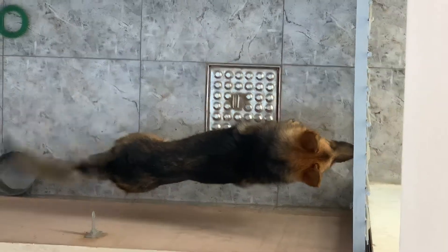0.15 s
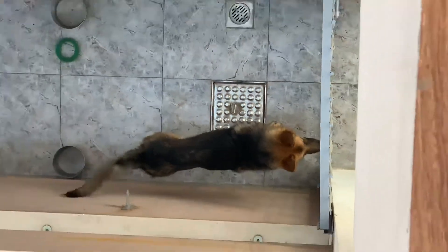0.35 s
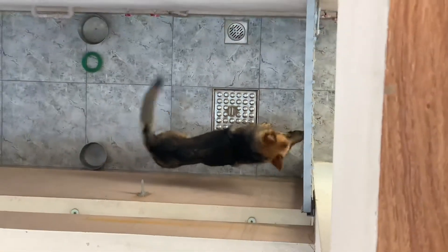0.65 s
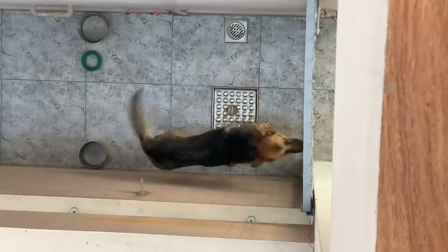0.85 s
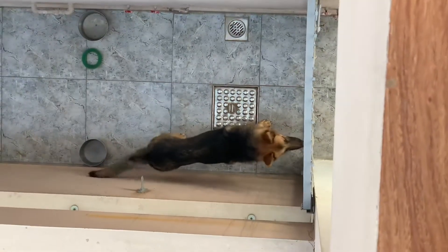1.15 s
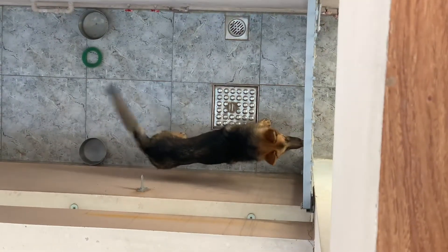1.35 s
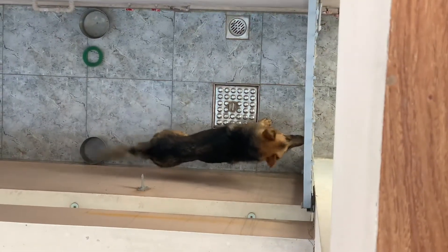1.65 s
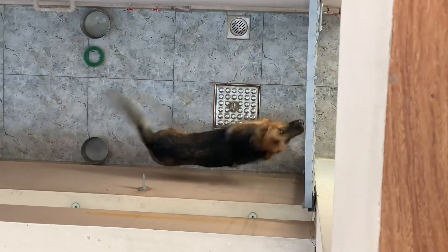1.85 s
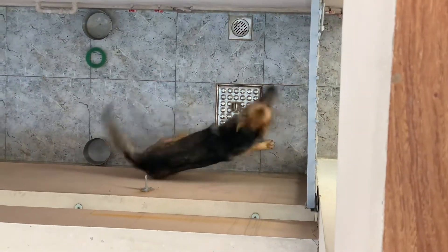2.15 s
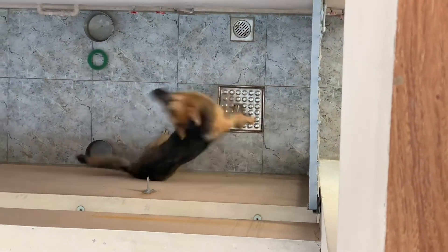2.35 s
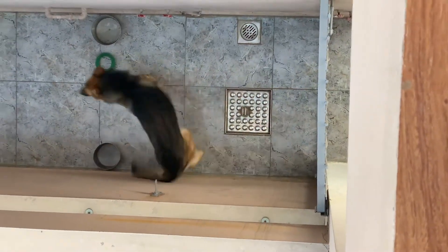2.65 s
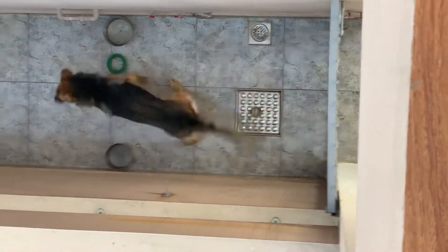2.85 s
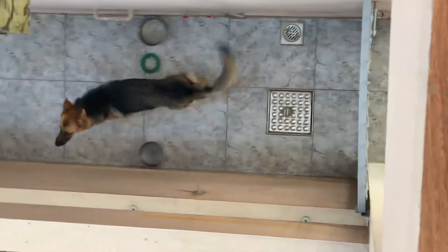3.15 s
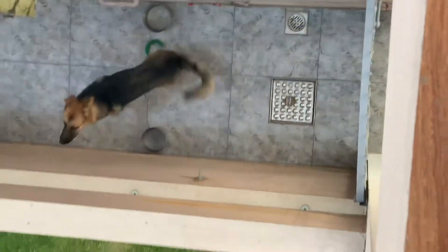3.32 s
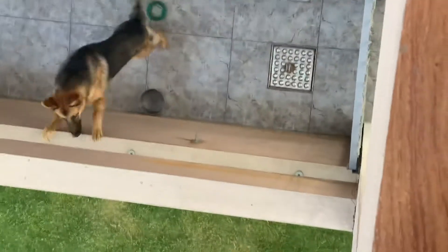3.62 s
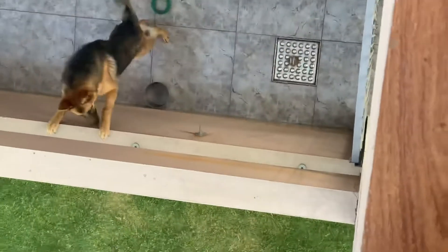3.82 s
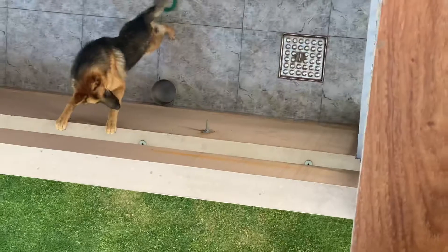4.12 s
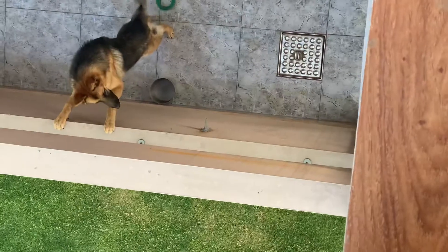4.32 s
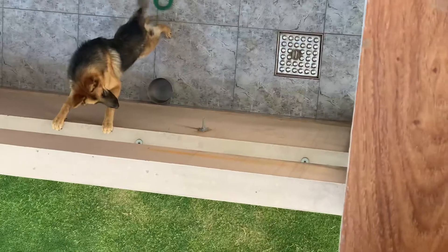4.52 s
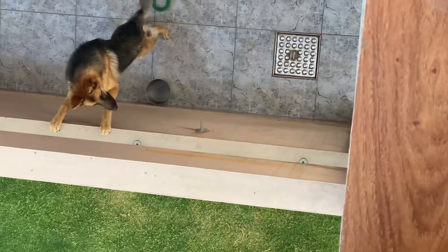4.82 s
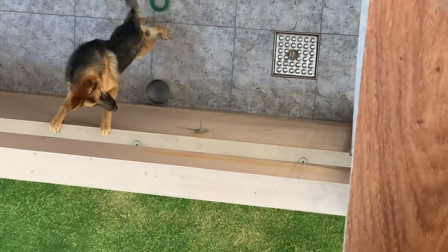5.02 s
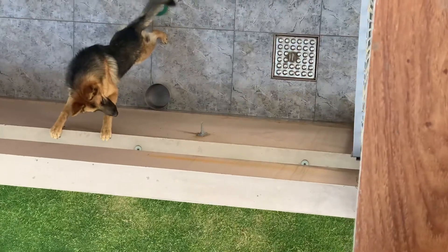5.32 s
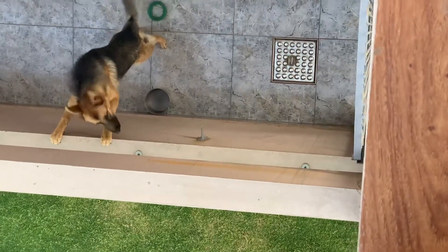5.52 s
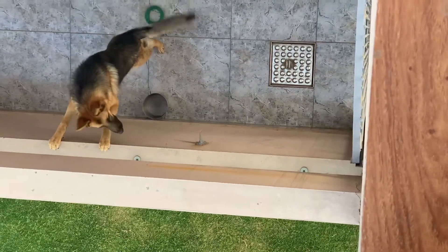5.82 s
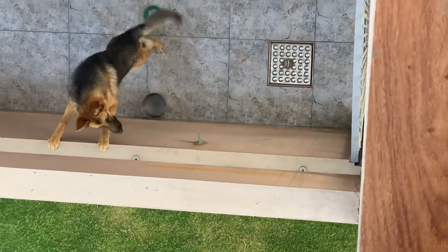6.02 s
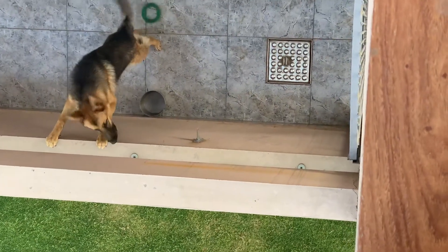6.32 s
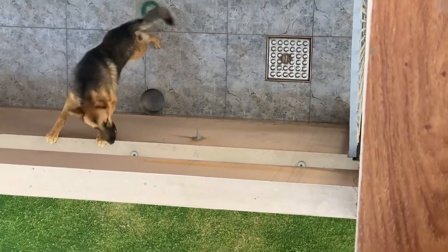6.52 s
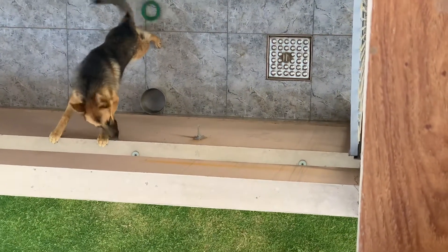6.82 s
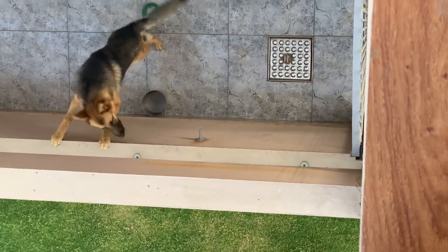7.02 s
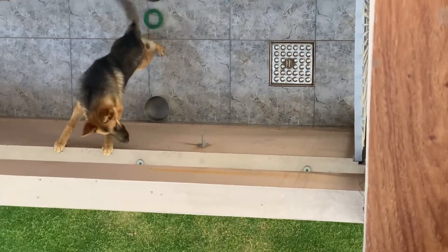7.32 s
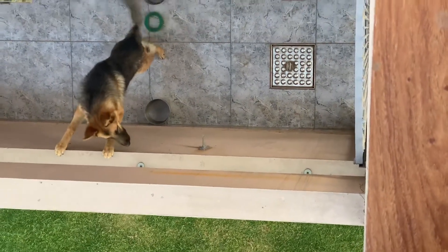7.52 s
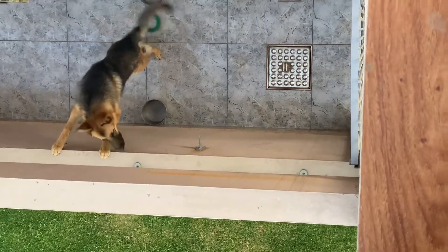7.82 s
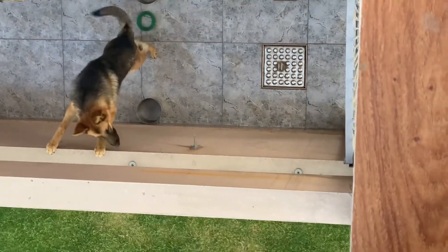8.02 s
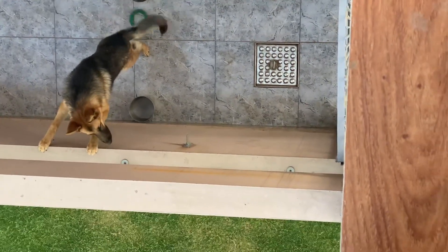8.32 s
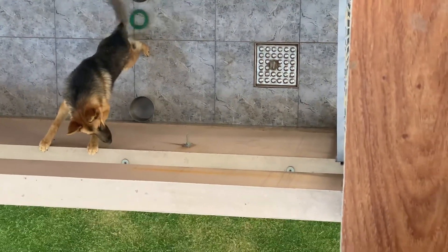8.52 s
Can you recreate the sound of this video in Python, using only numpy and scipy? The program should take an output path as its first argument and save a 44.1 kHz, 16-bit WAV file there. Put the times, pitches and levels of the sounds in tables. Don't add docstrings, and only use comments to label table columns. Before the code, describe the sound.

A large dog barks hoarsely in sharp single barks and quick runs, with panting and growls, echoing off balcony walls and distant houses over faint town rumble.

```python
import sys
import numpy as np
from scipy import signal
from scipy.fft import rfft, irfft, next_fast_len
from scipy.io import wavfile
from scipy.ndimage import uniform_filter1d, minimum_filter1d, map_coordinates

SR = 44100
rng = np.random.default_rng(int(sys.argv[2]) if len(sys.argv) > 2 else 0)


def makeup_ratio(level_db):
    decades = np.asarray(level_db, float) / 20
    return 10 ** decades


def file_out(sig):
    cols = np.atleast_2d(sig).T
    lim = np.clip(cols, -1, 1)
    pcm = np.round(lim * 32767).astype(np.int16)
    wavfile.write(sys.argv[1], SR, pcm)


N = 381906


def unit(x):
    return x / np.sqrt(np.mean(np.abs(x) ** 2) + 1e-20)


def along(points, hz):
    f, v = np.transpose(points)
    return np.interp(np.log(hz + 1), np.log(f + 1), v)


def span(rows):
    s, *columns = np.transpose(rows)
    first = round(s[0] * SR)
    t = np.arange(first, min(N, round(s[-1] * SR))) / SR
    return first, [np.interp(t, s, c) for c in columns]


def wobble(n, rate):
    knots = rng.standard_normal(int(n * rate / SR) + 4)
    return map_coordinates(knots, [np.arange(n) * rate / SR])


def filtered(x, response):
    m = next_fast_len(x.shape[-1] + 8192)
    return irfft(rfft(x, m) * response(np.fft.rfftfreq(m, 1 / SR)), m)[..., :x.shape[-1]]


def peak(f, hz, width):
    return 1j * f * width / (hz * hz - f * f + 1j * f * width)


def modes(table):
    return lambda f: sum((-1) ** k * makeup_ratio(db) * peak(f, hz, w) for k, (hz, w, db) in enumerate(table))


def add(out, at, x):
    out[..., at:at + x.shape[-1]] += x[..., :N - at]


def placed(x, pan_db, lag):
    late_s = rng.uniform(.0005, .012, (5, 1, 1)) + rng.uniform(0, .0003, (5, 2, 1))
    size = makeup_ratio(-21) * rng.normal(size=(5, 1, 1)) + makeup_ratio(-13) * rng.normal(size=(5, 2, 1))
    half = np.array([[.5], [-.5]])

    def paths(f):
        direct = np.exp(-2j * np.pi * f / (1 + (f / 9000) ** 2) * lag * half / SR)
        bounces = np.sum(size * np.exp(-2j * np.pi * f * late_s), axis=0)
        return direct + f * f / (f * f + 400 ** 2) * bounces

    return filtered(np.pad(x, (0, 800))[None], paths) * makeup_ratio(pan_db * half)


def town():
    # hz, density_db (per Hz)
    spectrum = [(12, -31.5), (25, -8), (40, -9), (59, 8.5), (85, 0.5), (256, -9), (328, -14), (587, -18.5),
                (889, -23.5), (1020, -23), (1210, -22), (2480, -29), (5000, -38.5), (13100, -48.5),
                (15000, -80)]
    # time_s, level_db
    swell = [(0, -49.5), (0.499, -49), (1.2, -45.5), (2, -47), (2.999, -48), (4.501, -48.5), (5.997, -50),
             (6.301, -48.5), (7.6, -51.5), (8.66, -51)]
    # hz, likeness (0-1)
    likeness = [(60, .97), (250, .96), (1000, .5), (4000, .15)]
    z = signal.stft(rng.standard_normal((2, N)), nperseg=1024)[2]
    fine = uniform_filter1d(uniform_filter1d(rng.standard_normal(z.shape[1:]), 8, 0), 8, 1)
    broad = uniform_filter1d(uniform_filter1d(fine, size=40, axis=0), size=10, axis=1)
    patches_db = 2 * unit(fine) + .7 * unit(broad)
    pair = signal.istft(z * makeup_ratio(patches_db), nperseg=1024)[1][:, :N]

    def mid_side(hz):
        turn = np.arccos(np.clip(along(likeness, hz), -1, 1)) / 2
        return makeup_ratio(along(spectrum, hz)) * [np.cos(turn), np.sin(turn)]

    mid, side = filtered(pair, mid_side)
    s, db = np.transpose(swell)
    level_db = np.interp(np.arange(N) / SR, s, db) + [[-1.5], [1.5]]
    return unit(np.array([mid + side, mid - side])) * makeup_ratio(level_db)


def knocks():
    # time_s, peak_db, pitch_hz
    blows = [(0.145, -48, 1550), (1.331, -43, 444), (7.542, -34.5, 1040), (8.637, -44.5, 1040),
             (2.0, -34.5, 387.6), (2.031, -35.5, 397), (4.207, -39.5, 590), (4.967, -48, 519),
             (5.153, -37.5, 478), (8.398, -43, 450)]
    out, t = np.zeros((2, N)), np.arange(SR // 10) / SR
    for s, db, hz in blows:
        envelope = makeup_ratio(db - 3.0 - 60 * t / 0.17) * (1 - np.exp(-t / 0.0035))
        add(out, round(s * SR), envelope * np.sin(2 * np.pi * hz * t))
    return out


def bird():
    # start_s, start_hz, end_hz, length_s, level_db
    whistle = (3.217, 4050, 3750, .05, -48)
    s, from_hz, to_hz, length, db = whistle
    out = np.zeros((2, N))
    u = np.clip(np.arange(SR // 10) / SR / length, 0, 1)
    hz = to_hz + (from_hz - to_hz) * (1 - u) ** 3 + 40 * wobble(len(u), 199)
    add(out, round(s * SR), makeup_ratio(db) * np.sin(np.pi * u) * np.sin(2 * np.pi * np.cumsum(hz) / SR))
    return out


def tail(decay, seconds, gap, lumpy_db):
    n = round(seconds * SR)
    noise = rng.standard_normal((3, n))
    pair = (noise[:2] + 0.5 * noise[2]) * makeup_ratio(lumpy_db * wobble(n, 38))
    hz, t, z = signal.stft(pair, SR, nperseg=256)
    h = signal.istft(z * makeup_ratio(-60 * t / along(decay, hz)[:, None]), SR, nperseg=256)[1]
    return np.pad(h / np.linalg.norm(h[0]), ((0, 0), (round(gap * SR), 0)))


def balcony():
    # hz, t60_s
    decay = [(200, 0.4), (1000, 0.28), (3000, 0.1), (4500, .08), (5600, 0.34), (10000, 0.077)]
    return makeup_ratio(-14) * tail(decay, seconds=.4, gap=.01, lumpy_db=1)


def flutter():
    # round_trip_s, centre_hz, width_hz, first_return_db, loss_per_trip_db
    facing = (.243, 1043.5, 196.5, -25, -4.5)
    trip, hz, width, first_db, loss_db = facing
    trips = np.zeros(2 * SR)
    trips[np.round(np.arange(1, 8) * trip * SR).astype(int)] = makeup_ratio(first_db + loss_db * np.arange(7))
    return filtered(trips, lambda f: peak(f, hz, width) ** 2)


def wall():
    # round_trip_s, spread_s, level_db
    front = (0.098, 0.01, -23.5)
    trip, spread, db = front
    t = np.arange(SR // 4) / SR
    noise = rng.standard_normal(len(t)) + .5 * rng.standard_normal((2, len(t)))
    h = noise * np.exp(-((t - trip) / spread) ** 2)
    return makeup_ratio(db) * h / np.linalg.norm(h[0])


def houses():
    # hz, t60_s
    decay = [(300, 1.7), (1100, 1.35), (2100, 0.97), (2900, 0.75), (3400, 1.8), (6000, 0.86)]
    fronts = lambda f: .4 + .5 * peak(f, 1150, 300) + .6 * peak(f, 2700, 1800)
    far = makeup_ratio(-15.5) * filtered(tail(decay, seconds=2.2, gap=.04, lumpy_db=-3.5), fronts)
    add(far, 0, flutter())
    add(far, 0, filtered(wall(), fronts))
    return far


def claws():
    # time_s, peak_db, left_right_db
    ticks = [(0.377, -73, 7.5), (1.1633, -63, 7.5), (1.4147, -59, 0), (1.5134, -55, 2), (3.5079, -67, -6),
             (3.5412, -57, 3.5), (3.5726, -48, -1.5), (3.6466, -50, 0), (3.935, -43.5, -16),
             (4.7201, -45.5, -2.5), (4.928, -51, -2.5), (4.977, -52.5, 4), (5.9198, -65, -7.5),
             (6.0673, -65.5, 1), (6.1085, -53.5, 5.5), (7.932, -54, 2)]
    out, t = np.zeros((2, N)), np.arange(SR // 10) / SR
    for s, db, pan_db in ticks:
        burst = rng.standard_normal(len(t)) * makeup_ratio(-60 * t / 0.0087)
        tick = filtered(burst, lambda f: peak(f, 7200, 6000))
        add(out, round(s * SR), makeup_ratio(db + 3.5) * tick * makeup_ratio([[pan_db / 2], [-pan_db / 2]]))
    return out


def panting():
    # start_s, length_s, level_db
    puffs = [
        (2.936, 0.21, -41.5),
        (3.715, 0.18, -39),
        (4.455, 0.19, -39.5),
        (5.117, 0.19, -39),
    ]
    # centre_hz, width_hz, level_db
    muzzle = [(846, 98, -3), (1448, 547, 2), (1892, 514, 3), (4240, 600, -8.5), (5740, 1000, -12.5),
              (8830, 2300, -13.5)]
    attack_s, release_s, quiet_db = 0.048, 0.22, -13.5
    out = np.zeros((2, N))
    for s, length, db in puffs:
        end = s + length
        at, (level_db,) = span([(s, db + quiet_db), (s + attack_s, db), (end, db),
                                (end + release_s, db + 2 * quiet_db)])
        air = unit(filtered(rng.standard_normal(len(level_db)), lambda f: modes(muzzle)(f) ** 2))
        add(out, at, placed(air * makeup_ratio(level_db + 0.63 * wobble(len(air), 90)), pan_db=0.0, lag=11.97))
    return out


def growls():
    # start_s, length_s, first_db, last_db, flaps_hz
    rumbles = [
        (4.456, 1, -51, -53, 62.54),
        (6.86, .22, -38, -44.5, 76.8),
        (7.067, .53, -39, -38.5, 77.3),
    ]
    # centre_hz, width_hz, level_db
    chests = [
        [(191.3, 88, 3.5), (267, 26, -8.5)],
        [(396.4, 53, 1), (235, 70, -3.5)],
        [(382, 41, 3), (230.1, 80, -3), (149.4, 55, -5.5), (727, 81, -7), (1540, 220, -12.5)],
    ]
    attack_s, quiet_db = 0.11, -13.5
    out = np.zeros((2, N))
    for (s, length, first_db, last_db, flap_hz), chest in zip(rumbles, chests):
        at, (level_db,) = span([(s, first_db + quiet_db), (s + attack_s, first_db), (s + length, last_db)])
        count = np.cumsum(flap_hz * (1 + .04 * wobble(len(level_db), 60))) / SR
        flaps = np.diff(np.floor(count), prepend=0) * makeup_ratio(0.47 * wobble(len(count), 85))
        flaps += .015 * rng.standard_normal(len(count))
        ringing = unit(filtered(flaps, lambda f: modes(chest)(f) ** 2))
        add(out, at, placed(makeup_ratio(level_db) * ringing, pan_db=-0.5, lag=1.0))
    return out


def gesture(call, breath, throat, part, rough_break, unsettled):
    # time_s, change_db, half_length_s
    level_swings = [(0.8, 5.5, 0.0085), (0.833, -3.5, 0.0066), (1.8, 8.5, 0.0093), (1.818, -6.5, 0.0089),
                    (1.845, -3, 0.0024), (2.078, -5, .011), (2.136, 4.5, 0.016), (2.152, -21.5, 0.007),
                    (2.178, 6, 0.0058), (2.659, -5.5, 0.0058), (2.672, 3.5, 0.0036), (2.676, -9, 0.00087),
                    (2.701, -14.5, 0.0036), (2.727, 6.5, 0.0019), (2.713, -5.5, 0.0039), (2.737, -14.5, 0.0076),
                    (5.397, 4, 0.003), (5.405, 5, 0.003), (5.406, -5, 0.0056), (5.429, 3.5, 0.009),
                    (5.456, -1, 0.006), (6.238, -6, 0.0037), (6.256, 4.5, 0.0064), (6.267, -8.5, 0.0027),
                    (6.276, 4, .004), (6.287, -3.5, 0.0064), (6.348, -1.5, 0.0089), (6.513, -9.5, 0.0027),
                    (6.523, 2, 0.0044), (6.527, -0.5, 0.0057), (6.55, 7.5, 0.002), (6.565, -4, 0.01),
                    (6.59, 2, 0.0035), (6.775, -1.5, .008), (6.814, -5, 0.0057), (6.872, -3, .007),
                    (7.616, -10.5, 0.0031), (7.628, 5, 0.0058), (7.672, -3.5, 0.0062), (7.692, -1, 0.0054)]
    s, length, db, shut_hz, top_hz = call
    attack, jump, last_hz, fade_db, grunt_db = breath
    rough, wide, upper_db = throat
    rough_onset, rough_grunt = .2, .65
    lock_s, creep, arch_s = .01, .5, .025
    release_s, grunt_s, grunt_hz = .022, 0.098, 186.9
    sluggish_s = .007
    open_hz = max(shut_hz, (top_hz + last_hz) / 2)
    shut_db = upper_db - 9
    slit = 0.037 * wide
    end = length + release_s
    release_db = max(fade_db - 20, grunt_db)
    rows = np.array([  # time_s, pitch_hz, level_db, roughness, mouth, upper_db
        (0, .88 * shut_hz, -22, rough_onset, slit, shut_db),
        (attack, shut_hz, 0, rough_onset, slit, shut_db),
        (min(attack + part, jump - lock_s), shut_hz, 0, rough_break, slit, upper_db),
        (jump - lock_s, shut_hz + creep * (open_hz - shut_hz), 0, rough_break, wide / 2, upper_db),
        (jump, open_hz, 0, rough, wide, upper_db),
        (min(jump + arch_s, length), top_hz, fade_db * arch_s / length, rough, wide, upper_db),
        (length, last_hz, fade_db, rough, wide, upper_db),
        (end, 0.67 * last_hz, release_db, rough_grunt, 0, shut_db),
        (end + grunt_s, grunt_hz, grunt_db - 9, rough_grunt, 0, shut_db)])
    rows[:, 0] = s + np.maximum.accumulate(rows[:, 0])
    at, controls = span(rows)
    smooth = uniform_filter1d(controls, round(sluggish_s * SR), mode="nearest")
    pitch, level_db, rough, mouth, upper_db = smooth
    t = (at + np.arange(len(pitch))) / SR
    swing_db = sum(dip_db * np.exp(-((t - when) / half) ** 2) for when, dip_db, half in level_swings)
    loose = np.interp(t - s - jump, [-lock_s, 0, unsettled, unsettled + lock_s], [0, 1, 1, 0])
    loose = (unsettled > 0) * loose
    rough = rough + loose * (rough_break - rough)
    return at, (pitch, db + level_db + swing_db, rough, mouth * (1 - loose / 2), upper_db)


def rasp(turn, level_db, rough, upper_db, air_db, gap_hz, top_db, snaps):
    # hz, density_db (per Hz)
    colour = [(1530, -39), (2600, -15), (4190, -16), (4760, -13.5), (5370, -16), (6610, -11), (9680, -17.5),
              (11800, -15), (13900, -21.5), (15500, -53)]
    n = len(turn)
    closing = unit(np.diff(np.floor(turn / (2 * np.pi)), prepend=0))
    snaps = np.clip(snaps, 0, 1) * np.clip(1 - rough, 0, 1)
    hz, _, z = signal.stft((1 - snaps) * rng.standard_normal(n) + snaps * closing, SR, nperseg=256)
    colour_db = along(colour, hz) + top_db * np.clip(np.log2(hz / 7000 + 1e-9), 0, 1)
    colour_db = colour_db - 24 * np.abs(peak(hz, gap_hz, 570)) ** 2
    patches = uniform_filter1d(rng.standard_normal(z.shape), size=2, axis=0)
    patches = uniform_filter1d(patches, size=20, axis=1)
    air = unit(signal.istft(z * makeup_ratio(colour_db[:, None] + 6.5 * unit(patches)), nperseg=256)[1][:n])
    air *= (1 + .5 * np.cos(turn)) * makeup_ratio(air_db - 28.5 + 2.2 * rough + .5 * upper_db)
    late_s = 0.012
    late_db = np.interp(np.arange(n) - late_s * SR, np.arange(n), level_db, left=-70)
    return air * makeup_ratio(0.44 * (late_db - level_db) + 2.4 * wobble(n, 30))


def bark(pitch, level_db, rough, mouth, upper_db, air_db, nose_hz, nose_db, cut_hz,
         gap_hz, top_db, snaps, cavities, shift_hz, drift, pattern):
    n = len(pitch)
    turn = 2 * np.pi * np.cumsum(pitch * (1 + 0.044 * rough * wobble(n, 250))) / SR
    mouth = np.clip(mouth, .02, .98)
    mouth_hz, cheek_hz, cheek_db, half_db, palate_db = cavities
    low_hz = np.minimum(pitch, 560)
    upper_hz = 1550 + shift_hz + 580 * mouth
    cheek = makeup_ratio(cheek_db - 13.0 + 19.5 * rough)
    voice, power = np.zeros(n), np.zeros(n)
    for k in np.arange(1, 11 * pattern + 1) / pattern:
        f = k * pitch
        throat = (1 - mouth) * peak(f, low_hz, 290) ** 2 + mouth * peak(f, mouth_hz, 320) ** 2
        throat = throat + makeup_ratio(upper_db) * peak(f, upper_hz, 320) ** 2
        throat = throat + cheek * peak(f, cheek_hz, 220) ** 2
        throat = throat + makeup_ratio(palate_db) * peak(f, 2450, 170) ** 2
        below = makeup_ratio(half_db - 7.0) if k < 1 else 1
        throat = throat * below / (1 + (f / cut_hz) ** 14)
        throat = throat + makeup_ratio(-38.5) * mouth * peak(f, 5700, 610) ** 2
        throat = throat + makeup_ratio(nose_db) * mouth * peak(f, nose_hz, 310) ** 2
        share = np.clip(rough * (.4 + .4 * k + .3 * (k % 1 > 0)), 0, 1)
        smear = .8 * unit(wobble(n, drift) + 1j * wobble(n, drift))
        steady = (1 - share ** 2) * (k % 1 == 0)
        voice += np.imag(throat * (steady + share * smear) * np.exp(1j * k * turn))
        power += np.abs(throat) ** 2 * (steady ** 2 + .64 * share ** 2) / 2
    air = rasp(turn, level_db, rough, upper_db, air_db, gap_hz, top_db, snaps)
    fade = np.minimum(1, np.minimum(np.arange(n), np.arange(n)[::-1]) / 250)
    return fade * makeup_ratio(level_db) * (voice / np.sqrt(power) + air)


def barks():
    # start_s, length_s, level_db, shut_lips_hz, top_hz
    calls = [(0.723, 0.11, -11.5, 513, 572.4), (0.831, 0.073, -23.5, 572.6, 580),
             (1.775, 0.11, -6.5, 552, 555.7), (2.054, 0.13, -13, 418, 577.4),
             (2.62, 0.11, -11.5, 825.4, 1171), (3.193, 0.025, -26.5, 415, 383),
             (5.356, 0.13, -13, 415.8, 554), (6.214, .128, -11.5, 382, 500.4),
             (6.465, 0.13, -11, 384.7, 497.7), (6.757, .11, -11, 387.8, 518.3),
             (6.866, 0.039, -18.5, 481.5, 510), (7.58, 0.13, -13.5, 383.8, 535.2)]
    # attack_s, jump_done_s, last_hz, fade_db, grunt_db
    breaths = [(.02, .05, 530, -6.5, -21), (0.011, 0.012, 540, -9, -29), (0.028, 0.029, 480, -12.5, -30),
               (.03, 0.049, 526, -5, -28.5), (.032, 0.046, 1125, -3.5, -48), (0.013, 0.022, 395, -7, -62),
               (.032, 0.062, 545, -0.5, -41), (0.02, 0.067, 510, -3, -15.5), (.034, 0.064, 419, -7, -17.5),
               (.04, .067, 520, -9, -27), (0.019, 0.023, 510, -6, -18), (.02, 0.055, 520, 1.5, -15)]
    throats = [(0.6, 0.16, -7, 2700, -17), (0.2, 0.7, -12.5, 2900, -14), (0.69, 0.36, -5.5, 3000, -23.5),
               (0.13, 0.87, -9.5, 3350, -25), (0.26, 0.6, -9, 3370, -35), (0, 0, -35, 3200, -53),
               (0.13, 0.64, -3, 3300, -25), (0.52, 0.54, -9, 4500, -33.5), (0.7, 0.05, -7, 3350, -7.5),
               (0.06, 0.72, -4, 2400, -34), (0.49, 0.18, -9.5, 2700, -32.5), (0.2, 0.68, -9, 3150, -28.5)]
    # left_right_db, air_noise_db, sent_to_houses_db, voice_cutoff_hz
    heads = [(2, -1, -1, 2600), (3, 2.5, 6.5, 3500), (0.5, -1.5, 2.5, 2180), (2, 5.5, -2.5, 2770),
             (-1.5, 8, -1.5, 2740), (1, 15, -5, 2700), (-0.5, 1.5, -5.5, 2680), (-0.5, 6, -9.5, 2264),
             (-0.5, 0.5, 0, 2450), (-1, 1.5, -3.5, 2290), (-1, -3, -16, 2400), (1, 4.5, -5, 2340)]
    # lips_part_s, roughness of the break (0-1), unsettled_past_jump_s
    settles = [(.02, .55, 0), (.01, .3, 0), (.022, .45, 0), (.014, .6, 0), (.006, .5, 0), (.01, .03, 0),
               (.006, .7, .024), (.018, .65, 0), (.018, .65, 0), (.02, .55, 0), (.01, .6, 0),
               (.024, .7, .042)]
    # gap_in_air_hz, top_octave_db, share of fold snaps (0-1), left_lag (samples)
    shadows = [(4540, -6, 0.87, -3), (4594, -7, .3, -2.5), (9300, 5, 0.04, -2), (9400, -2, 0.19, -2.5),
               (4300, -10.5, 0.6, -4), (4400, -7, 0.2, -3), (5300, -2, 0, -2), (5360, -4.5, 0.4, -2),
               (3840, -2, 0.8, -2), (5400, -11.5, 0.6, -2), (5440, -3, .2, -0.5), (4500, -9, 0.2, -2.5)]
    # mouth_hz, cheek_hz, cheek_db, half_pitch_db, palate_db
    hollows = [(1038, 810, -1.5, 4, -18), (1160, 780, -16.5, -0.5, -23), (940, 750, -2, 8.5, -22.5),
               (1042, 580, -16.5, 3.5, -29.5), (1250, 900, -10.5, -5, -29.5), (1070, 890, -12, -9, -46),
               (1071, 900, -2.5, 4, -19), (1120, 793, -5, 0.5, -11), (1060, 900, -4, -1.5, -22.5),
               (1040, 500, -4.5, -4.5, -22), (1040, 700, -1.5, -3, -13), (1003, 870, -4.5, 0, -29)]
    # upper_resonance_shift_hz, drift of uneven cycles (per s)
    folds = [(-100, 120), (2.5, 200), (-370, 60), (0.5, 260), (-0.5, 240), (0, 250), (-58, 150), (-5, 130),
             (-170, 130), (164, 200), (-1.5, 320), (126, 170)]
    patterns = [2, 2, 3, 2, 2, 2, 2, 2, 2, 2, 2, 2]
    out, sent = np.zeros((2, N)), np.zeros(N)
    for call, breath, throat, head, settle, (*shadow, lag), cavities, fold, pattern in zip(
            calls, breaths, throats, heads, settles, shadows, hollows, folds, patterns):
        pan_db, air_db, sent_db, cut_hz = head
        at, controls = gesture(call, breath, throat[:3], *settle)
        sound = bark(*controls, air_db, *throat[3:], cut_hz, *shadow, cavities, *fold, pattern)
        add(out, at, placed(sound, pan_db, lag))
        add(sent, at, makeup_ratio(sent_db) * sound)
    return out, sent


def scene():
    near, sent = barks()
    dog = near + growls() + panting()
    close = signal.oaconvolve(dog.mean(axis=0)[None], balcony(), axes=1)[:, :N]
    far = signal.fftconvolve(sent[None], houses(), axes=1)[:, :N]
    return dog + close + far + claws() + knocks() + bird() + town()


def low_pass(x):
    return signal.sosfilt(signal.butter(12, 15720, fs=SR, output="sos"), x)


def record(dry):
    mid, side = dry.mean(axis=0), (dry[0] - dry[1]) / 2
    notches = lambda f: (1 - peak(f, 11500, 1300)) * (1 - peak(f, 12050, 1100))
    mid = filtered(mid, lambda f: notches(f) / (1 + (f / 14500) ** 40))
    both = np.array([mid + side, mid - side])
    need = np.minimum(1, .92 / (np.abs(both).max(axis=0) + 1e-9))
    gain = uniform_filter1d(minimum_filter1d(need, size=400), size=200)
    return low_pass(both * gain)


dry = scene()
out = record(dry)
file_out(out)
```